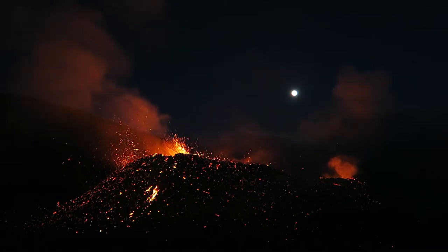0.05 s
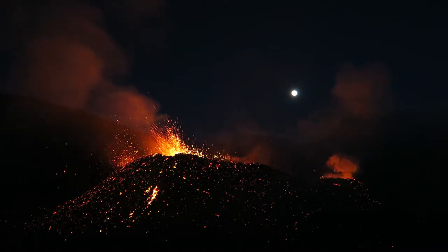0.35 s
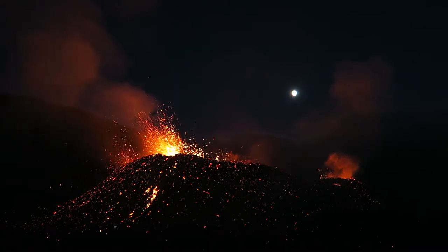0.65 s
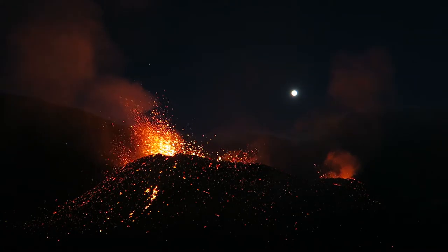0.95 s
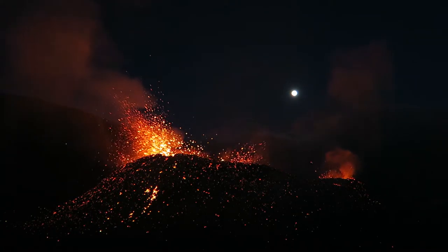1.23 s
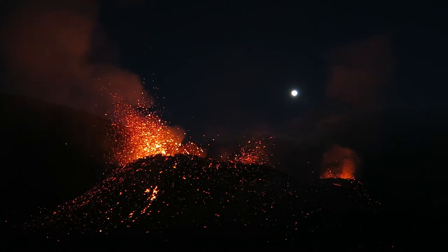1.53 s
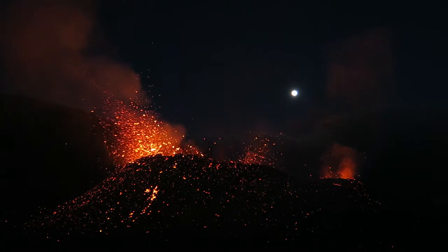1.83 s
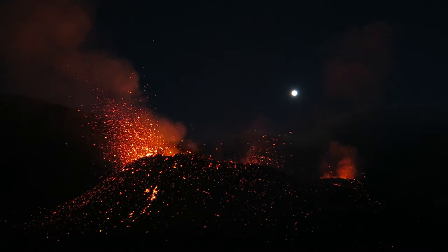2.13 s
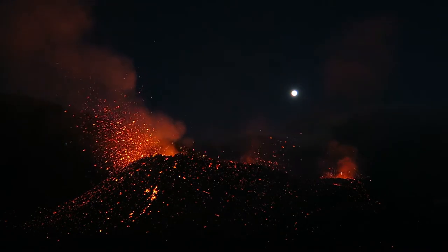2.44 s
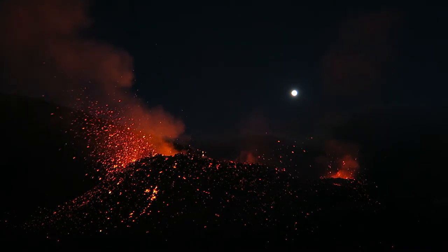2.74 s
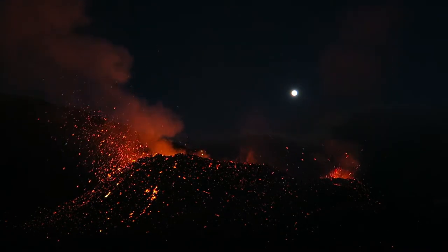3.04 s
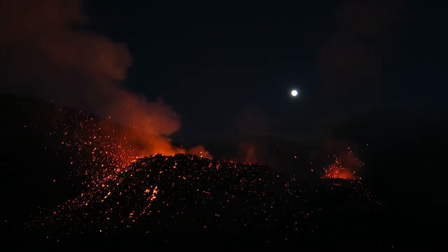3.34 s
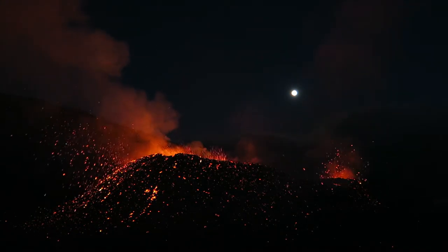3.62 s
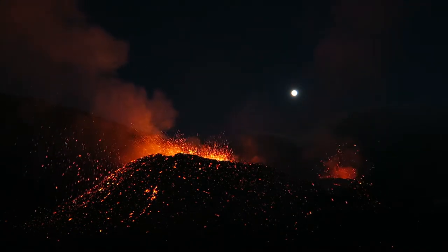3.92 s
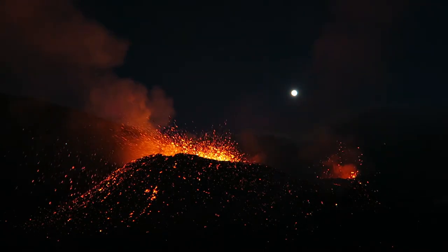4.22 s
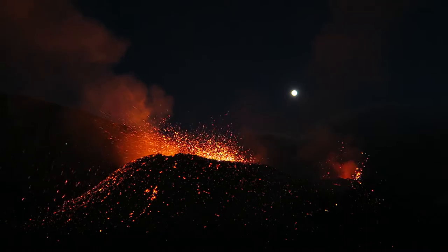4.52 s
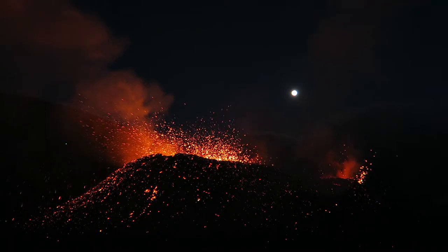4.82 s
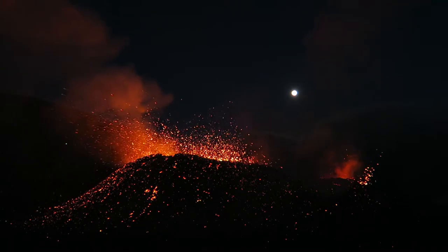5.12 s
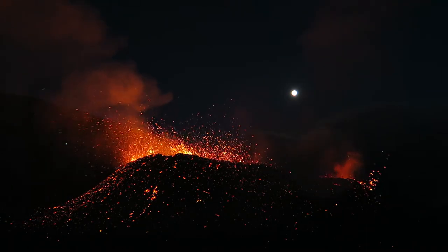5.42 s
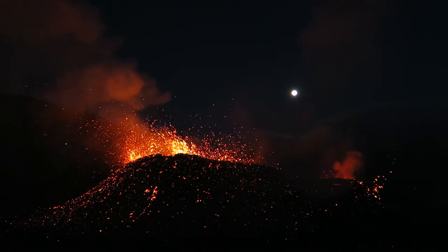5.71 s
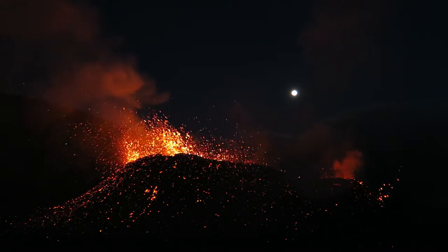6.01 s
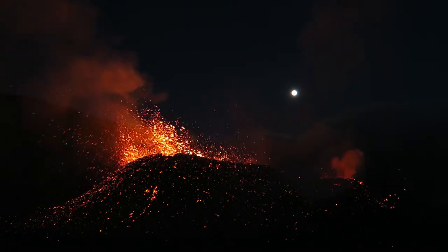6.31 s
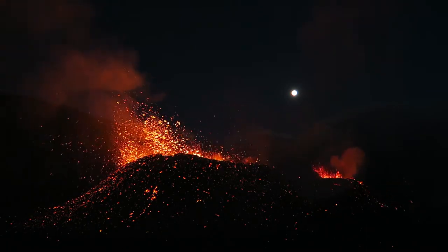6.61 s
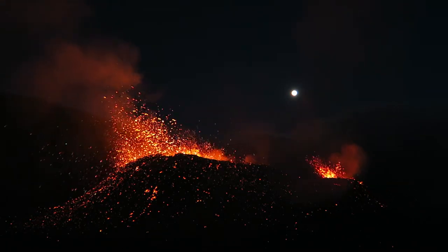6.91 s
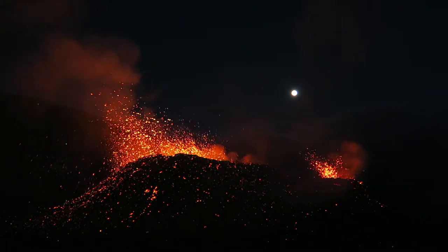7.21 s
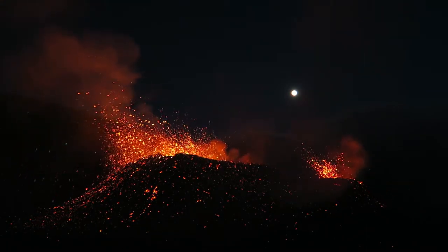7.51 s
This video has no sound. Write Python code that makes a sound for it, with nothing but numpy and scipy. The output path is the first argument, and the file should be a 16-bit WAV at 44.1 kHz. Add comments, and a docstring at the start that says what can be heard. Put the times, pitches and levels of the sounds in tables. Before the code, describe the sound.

Low wind noise on an outdoor microphone dominates, close and wide, with a volcano rumbling far ahead. In the first half second the wind is light and distant gas jets give a short roar and hiss. From about 0.6 seconds gusts hit hard, with irregular thumps, hollow pops, crackle and tiny dry ticks. The buffeting is densest from 1.2 to 2.2 seconds, turns to choppy flutter, and thumps again near 3.5. A faint jet roars around 3.7 seconds as the wind briefly drops. Strong thumps follow at about 4.3 and 4.7 seconds. From 5 to 5.8 seconds the wind eases, revealing rushing spurts from the vents that swell into a soft roar and fine hiss around 6. Gusts return at 6.1 seconds with knocks and pops, dip near 6.8, then build again until the end at about 7.7 seconds.

```python
"""Night wind at an erupting volcano

A stereo camera microphone stands in the open wind. Right at its two ports, nearly in opposite
phase, gusts flutter and eddies thump and crackle, with hollow pops and small dry ticks among them.
Far off, straight ahead, the vents rumble and let out jets of gas that swell into a roar and a hiss."""
import sys
import numpy as np
from scipy import signal
from scipy.fft import rfft, irfft
from scipy.io import wavfile
from scipy.ndimage import uniform_filter1d

SR = 44100
rng = np.random.default_rng(int(sys.argv[2]) if len(sys.argv) > 2 else 0)


def dump(signal):
    """Clip the signal to [-1, 1] and save it as 16-bit WAV at the path in sys.argv[1]."""
    limited = np.clip(np.atleast_2d(signal).T, -1, 1)
    pcm = np.round(limited * 32767).astype(np.int16)
    wavfile.write(sys.argv[1], SR, pcm)


N = 341775
TIME = np.arange(N) / SR
BINS = np.fft.rfftfreq(N, 1 / SR)


def gain_of(db):
    """Decibels to amplitude."""
    return 10 ** (np.asarray(db) / 20)


def unit_rms(x):
    """Scales to an rms of 1."""
    return x / np.sqrt(np.mean(x ** 2) + 1e-20)


def over_frequency(rows, column=1):
    """One column of a frequency table, at every bin."""
    table = np.transpose(rows)
    return np.interp(np.log(BINS + 1), np.log(table[0] + 1), table[column])


def over_time(rows, column=1):
    """One column of a time table, at every sample."""
    table = np.transpose(rows)
    return np.interp(TIME, table[0], table[column])


def coloured(x, spectrum):
    """Gives white sound a spectrum and keeps its power."""
    return irfft(rfft(x) * unit_rms(gain_of(over_frequency(spectrum))), N)


def wander(rate_hz):
    """Random drift of rms 1, mostly between 4 Hz and the rate."""
    drift = rfft(rng.standard_normal(N)) * np.exp(-(BINS / rate_hz) ** 2) * BINS / (BINS + 4)
    return unit_rms(irfft(drift, N))


def soft_wander(rate_hz, reach=1.3):
    """Random drift with its extremes rounded off."""
    return reach * np.tanh(wander(rate_hz) / reach)


def levelled(x, span_s):
    """Evens out the power over a span and leaves the faster lumps."""
    size = max(int(span_s * SR), 8)
    power = uniform_filter1d(uniform_filter1d((x ** 2).mean(0), size), size)
    return x / np.sqrt(abs(power) + 1e-9)


def stereo(mid, side):
    """Mid and side to left and right."""
    return np.array([mid + side, mid - side])


# Wind across the microphone's two ports:
# (frequency [Hz], left's phase lead [rad], likeness [0-1], left minus right [dB])
PORTS = [(25, 0.61, 0.12, 1), (56, 1.29, 0.93, -7.5), (116, 2.293, 0.94, 1), (274, 2.88, 0.92, 2.5),
         (504, 2.866, 0.92, 4), (720, 3.05, 0.81, -0.5), (1330, 4.17, 1, 0.5), (3000, 4.08, 1, 3)]

def at_ports(flows):
    """Two unrelated flows become left and right: an eddy pushes on one port as it pulls on the other."""
    left, other = rfft(flows)
    likeness = np.clip(over_frequency(PORTS, column=2), 0, .995)
    lead_rad, tilt_db = over_frequency(PORTS), over_frequency(PORTS, column=3)
    right = (likeness * left + np.sqrt(1 - likeness ** 2) * other) * np.exp(-1j * lead_rad)
    return irfft(np.array([left * gain_of(tilt_db / 2), right * gain_of(-tilt_db / 2)]), N)


def turbulence(spectrum, lumps_db):
    """Lumpy pressure noise at both ports."""
    flows = rng.standard_normal((2, N)) * gain_of(lumps_db)
    return unit_rms(at_ports(coloured(flows, spectrum)))


def narrow_bass(x, corner_hz=42):
    """The longest waves press on both ports alike, so their difference fades."""
    mid, side = (x[0] + x[1]) / 2, (x[0] - x[1]) / 2
    side = irfft(rfft(side) * BINS ** 2 / np.hypot(BINS ** 2, corner_hz ** 2), N)
    return stereo(mid, side)


# Wind pressure on the microphone: (time [s], relative level [dB])
GUSTS = [(0.0, -32), (0.3, -30.5), (0.42, -31.5), (0.56, -21), (0.71, -23.5), (0.91, -20.5), (1.16, -20.5),
         (1.36, -17), (1.62, -21), (2.0, -23.5), (2.13, -20), (2.28, -27.5), (2.38, -21.5), (2.6, -26),
         (2.68, -25), (2.76, -23), (2.92, -25), (3.14, -24), (3.32, -26), (3.42, -19), (3.52, -25),
         (3.58, -26.5), (3.74, -19.5), (3.83, -23.5), (3.9, -41.5), (4.21, -28.5), (4.26, -23),
         (4.42, -27.5), (4.6, -22.5), (4.72, -18.5), (4.87, -28.5), (5.03, -35.5), (5.56, -36), (6.11, -19),
         (6.7, -22), (6.74, -30), (6.85, -35), (6.97, -25.5), (7.15, -26.5), (7.28, -22.5), (7.58, -17.5),
         (7.74, -20.5)]
# Share of small eddies in that wind: (time [s], flutter gain [dB])
CHOPPINESS = [(0.7, -2), (1.5, 1), (2.1, 7), (2.4, 6.5), (2.9, 1.5), (4.3, 3), (4.8, -4), (6.4, -1),
              (7.6, 0.5)]
# The wind's low body and the flutter of its small eddies: (frequency [Hz], relative level [dB])
BODY_SPECTRUM = [(15, -31), (30, -19.5), (50, -11.5), (85, -2), (130, 1.5), (200, 1.5), (300, -3),
                 (470, -10.5), (520, -29.5), (800, -47), (2000, -96)]
FLUTTER_SPECTRUM = [(200, -15), (500, 5.5), (720, 1), (1000, -10), (1500, -23.5), (2500, -36), (5000, -53),
                    (12000, -69)]

def wind(flutter_db=-46.5, steepness=1.4, unrest_db=1.53, surge_db=-15):
    """Restless gusts on the microphone drive a low body and a flutter that grows faster than it."""
    pressure = gain_of(over_time(GUSTS) + wake() + unrest_db * wander(11))
    surge = gain_of(surge_db) * eddy_swells(THUMP, half_s=0.018)  # air speeds up around each eddy
    lumps = soft_wander(60)
    body = levelled(turbulence(BODY_SPECTRUM, lumps_db=4 * lumps), span_s=0.048)
    flutter = turbulence(FLUTTER_SPECTRUM, lumps_db=3.5 * lumps + 4.5 * soft_wander(110))
    flutter = levelled(flutter, span_s=0.054)
    drive_db = steepness * (20 * np.log10(pressure) + 21.5) + over_time(CHOPPINESS)
    return body * np.hypot(pressure, surge) + flutter * gain_of(drive_db + flutter_db)


def wake(depth_db=-2, lag_s=0.041, half_s=0.0031):
    """The wind sags briefly behind each strong eddy, in dB."""
    nearest = np.min([((TIME - at_s - lag_s) / half_s) ** 2 for at_s, *_ in EDDIES], axis=0)
    return depth_db * np.exp(-.5 * nearest.clip(0, 50))


def distant(spectrum, level_db, width, flicker_db):
    """Noise from straight ahead, flickering in the moving air; width is side over mid."""
    noise = rng.standard_normal((2, N)) * unit_rms(gain_of(flicker_db * wander(46)))
    mid, side = coloured(noise, spectrum)
    return stereo(mid, width * side) * gain_of(level_db)


# Low end of the far volcano and the close wind: (frequency [Hz], relative level [dB])
RUMBLE_SPECTRUM = [(12, -21.5), (25, -4), (45, 1), (70, 1.5), (120, -1.5), (250, -27), (600, -43.5),
                   (2000, -90.5)]

def rumble(volcano_db=-43, gust_db=-21, push_db=-2):
    """Deep rumble: the volcano's steady share, the weight of the gusts and the push of each eddy."""
    gusts = gain_of(gust_db + 0.7 * over_time(GUSTS))
    pushes = gain_of(push_db) * eddy_swells(PUSH, half_s=0.034)
    power = gain_of(volcano_db) ** 2 + gusts ** 2 + pushes ** 2
    return distant(RUMBLE_SPECTRUM, 10 * np.log10(power), width=0.16, flicker_db=1.5)


# Fine high fizz from the far vents: (time [s], relative level [dB])
FIZZING = [(0.55, -87.5), (0.8, -99), (1.64, -91), (2.1, -101), (2.55, -93), (2.8, -85.5), (3.1, -85),
           (3.42, -90.5), (3.55, -87), (3.72, -84), (3.9, -90.5), (4.6, -99), (5.15, -90), (5.55, -89),
           (5.7, -81), (5.92, -75.5), (6.15, -84), (6.65, -100), (7.33, -100), (7.45, -91), (7.75, -89)]
# The volcano's layers as they reach the microphone: (frequency [Hz], relative level [dB])
WASH_SPECTRUM = [(100, 1), (400, 5.5), (550, -4.5), (900, -8.5), (1400, -20.5), (2500, -37), (6000, -59)]
ROAR_SPECTRUM = [(200, -4), (450, 5.5), (750, 0), (1050, -1), (1280, -2.5), (1520, 0), (1700, -4),
                 (1900, -1.5), (2150, -6.5), (2400, -6), (3200, -15.5), (4200, -27), (6000, -43.5),
                 (10000, -56.5)]
HISS_SPECTRUM = [(1500, -20.5), (2800, 2.5), (3800, 1), (4800, -4), (5600, -8), (7000, -15), (9000, -25),
                 (13000, -42)]
FIZZ_SPECTRUM = [(4000, -3.5), (7000, 8), (9000, 6), (11500, 5), (13000, -8)]

def volcano():
    """Far ahead, a steady wash lies under the roar, hiss and fizz of escaping gas."""
    roar_db, hiss_db = gas_levels()
    wash = distant(WASH_SPECTRUM, level_db=-54.5, width=.4, flicker_db=-0.5)
    roar = distant(ROAR_SPECTRUM, roar_db + 6.5, width=.17, flicker_db=1.0)
    hiss = distant(HISS_SPECTRUM, hiss_db + 9, width=.38, flicker_db=1.5)
    fizz = distant(FIZZ_SPECTRUM, over_time(FIZZING) - 1 + 2 * wander(10), width=.6, flicker_db=0.6)
    return (wash + roar + hiss + fizz + vent_throats()) * gain_of([[.2], [-.2]])  # a touch to the left


# Steady escape of gas from the far vents: (time [s], relative roar [dB], relative hiss [dB])
VENTING = [(0.65, -66.5, -81), (1.15, -74, -88.5), (2.1, -77.5, -92.5), (3.001, -74.5, -86.5),
           (3.499, -74, -88), (3.9, -65.5, -85), (4.6, -69.5, -86), (5.2, -64, -87.5), (6.1, -61, -79.5),
           (6.4, -66, -83), (6.52, -79.5, -93), (6.651, -68.5, -89.5), (7.101, -72.5, -95), (7.7, -70, -84)]
# Jets from those vents: (start [s], end [s], relative roar [dB], relative hiss [dB],
# throat level [dB], throat resonance [Hz], resonance width [Hz])
JETS = [(-0.05, 0.6, -55.5, -71, -74.5, 3600, 2600), (0.273, 0.293, -51.5, -66.5, -63, 1500, 2000),
        (0.338, 0.357, -50.5, -67.5, -39, 487, 298), (0.352, 0.482, -62, -87, -54, 1000, 1390),
        (0.46, 0.575, -52.5, -76, -59, 1700, 1800), (0.59, 0.631, -58.5, -80, -68, 3880, 2400),
        (1.021, 1.101, -63.5, -86.5, -75.5, 3490, 2390), (3.6, 3.85, -54, -80.5, -65.5, 2900, 2390),
        (4.897, 5.096, -70, -100, -59, 750, 700), (5.125, 5.27, -62, -84.5, -53, 755, 990),
        (5.28, 5.545, -65, -88, -52, 710, 1100), (5.642, 6.07, -72, -78, -66.5, 3970, 1500),
        (6.062, 6.156, -57, -90, -55.5, 1094, 996), (6.19, 6.266, -59, -98, -48, 1130, 1450),
        (7.43, 7.675, -78, -86.5, -76.5, 4550, 950)]

def gas_levels():
    """Roar and hiss in dB: every jet adds its power to the steady venting."""
    power = gain_of([over_time(VENTING, column=1), over_time(VENTING, column=2)]) ** 2
    for start, end, roar_db, hiss_db, *_ in JETS:
        power += (gain_of([[roar_db], [hiss_db]]) * jet_flow(start, end)) ** 2
    return 10 * np.log10(power)


def jet_flow(start, end, rise_s=0.078, fall_s=0.12):
    """Gas flow of one jet: it opens, holds and shuts, faster if the jet is short."""
    half_s = (end - start) / 2
    opening = np.clip((TIME - start) / min(rise_s, half_s) + .5, 0, 1)
    shutting = np.clip((end - TIME) / min(fall_s, half_s) + .5, 0, 1)
    return opening * shutting


def vent_throats(flicker_db=-1.5, width=.2):
    """Each jet excites one broad resonance of its vent, swelling and fading."""
    out = np.zeros((2, N))
    flicker = gain_of(flicker_db * wander(40))
    for start, end, _, _, db, centre_hz, width_hz in JETS:
        resonance = (1 + ((BINS - centre_hz) / width_hz) ** 2) ** -3
        mid, side = unit_rms(irfft(rfft(rng.standard_normal((2, N))) * resonance, N))
        out += gain_of(db) * jet_flow(start, end) * stereo(mid, width * side)
    return out * flicker


# The strongest eddies to hit the microphone, in relative levels:
# (time [s], thump [dB], knock [dB], deep push [dB])
EDDIES = [(0.112, -23, -61, -38), (0.209, -17.5, -63, -33), (0.299, -15.5, -45, -22),
          (0.581, -16.5, -42, -14), (0.633, -7.5, -30, -28), (0.777, -19.5, -46.5, -20),
          (0.836, -6.5, -36, -39), (0.989, -14.5, -47.5, -32), (1.095, -7.5, -54.5, -22),
          (1.178, -23, -42.5, -44.5), (1.252, -8, -29, -25.5), (1.344, -10, -37.5, -30),
          (1.41, -12.5, -39, -29), (1.472, -22, -36, -45), (1.518, -19.5, -38, -39),
          (1.575, -15.5, -41, -46), (1.651, -12, -25, -30), (1.686, -14, -39, -41), (1.736, -9.5, -28, -22),
          (1.849, -8.5, -27, -38), (1.942, -14.5, -37, -48), (2.053, -15, -36, -40.5),
          (2.095, -13.5, -34, -30.5), (2.142, -12.5, -40.5, -30.5), (2.182, -15.5, -41, -43),
          (2.236, -18, -46, -52.5), (2.33, -24, -42, -47), (2.384, -13, -48, -43),
          (2.476, -16.5, -36.5, -58), (2.521, -18, -50, -43), (2.601, -13.5, -39.5, -50),
          (2.735, -16.5, -43, -44), (2.84, -21, -50, -49.5), (2.998, -15, -47, -55), (3.065, -21, -60, -47),
          (3.427, -11, -39, -42), (3.476, -8.5, -43, -29.5), (3.532, -20, -32, -53), (3.995, -23, -60, -57),
          (4.113, -24, -50, -29.5), (4.239, -11, -65, -40), (4.275, -7.5, -33, -24),
          (4.348, -21.5, -40, -39.5), (4.509, -16, -43, -43.5), (4.715, -7, -36, -26.5),
          (4.8, -20, -48, -43), (4.871, -19, -58.5, -36), (4.943, -17, -64, -43), (5.365, -22, -61.5, -33),
          (6.087, -11.5, -36, -29.5), (6.207, -10.5, -32.5, -26.5), (6.259, -13, -41, -26),
          (6.333, -17.5, -42.5, -29.5), (6.386, -25, -41.5, -32.5), (6.419, -14, -40, -32),
          (6.463, -11, -39, -37), (6.478, -9, -38, -29.5), (6.519, -15, -46, -48), (6.65, -9, -38, -41.5),
          (6.665, -14, -50, -45), (6.698, -13.5, -41, -49), (6.912, -21, -57, -40),
          (7.222, -13.5, -37.5, -55), (7.317, -16, -37, -52), (7.445, -28, -41, -33),
          (7.462, -10.5, -45, -29), (7.566, -13, -56, -33), (7.655, -13, -54, -41)]
THUMP, KNOCK, PUSH = 1, 2, 3  # its columns
# The hard knock on top of an eddy: (frequency [Hz], relative level [dB])
KNOCK_SPECTRUM = [(250, -16.5), (500, 11), (720, 0.5), (950, -5), (1200, -14.5), (1700, -25.5),
                  (2500, -49.5), (5000, -54), (12000, -70.5)]

def buffets(thump_db=-1, shared=0.26):
    """Each strong eddy is a low thump with a knock on top; both ports feel part of the knock alike."""
    thump = levelled(turbulence(BODY_SPECTRUM, lumps_db=0), span_s=0.027) * gain_of(thump_db)
    knock = turbulence(KNOCK_SPECTRUM, lumps_db=0)
    knock += shared * coloured(rng.standard_normal(N), KNOCK_SPECTRUM)
    knock = levelled(knock, span_s=0.0033)
    return thump * eddy_swells(THUMP, half_s=0.008) + knock * eddy_swells(KNOCK, half_s=0.0093)


def eddy_swells(column, half_s):
    """A bell-shaped swell at each strong eddy, as high as one column of its row."""
    out = np.zeros(N)
    for eddy in EDDIES:
        at_s = eddy[0]
        near = slice(*np.searchsorted(TIME, [at_s - .2, at_s + .2]))
        out[near] += gain_of(eddy[column]) * np.exp(-.5 * ((TIME[near] - at_s) / half_s) ** 2)
    return out


# Snaps right at the ports: (frequency [Hz], relative level [dB])
CRACKLE_SPECTRUM = [(700, -3), (1600, 5.5), (2300, -3), (3200, -17.5), (6000, -38.5), (10000, -58.5)]

def crackle(snaps_per_s=220, uneven_db=5, level_db=-25):
    """Tiny uneven snaps at each port follow the knock of the eddy that they ride on."""
    snaps = (rng.random((2, N)) < snaps_per_s / SR) * rng.choice([-1, 1], (2, N))
    snaps = snaps * gain_of(uneven_db * rng.uniform(-1, 1, (2, N)))
    crackling = unit_rms(at_ports(coloured(snaps, CRACKLE_SPECTRUM)))
    return crackling * gain_of(level_db) * eddy_swells(KNOCK, half_s=0.01)


# Hollow pops and dull thuds on the microphone: (time [s], envelope peak [dB], pitch [Hz])
POPS = [(.297, -15, 91), (.636, -15.5, 220), (.639, -27.5, 726), (.837, -19, 704), (1.242, -42, 950),
        (1.473, -33.5, 980), (1.661, -30.5, 845), (1.738, -14, 280), (1.854, -35, 900), (2.095, -39.5, 785),
        (2.183, -18, 300), (2.571, -38, 720), (2.972, -34, 625), (3.533, -33, 815), (4.234, -15.5, 109),
        (4.273, -15, 189), (4.716, -34.5, 840), (6.085, -14.5, 354), (6.477, -11.5, 240)]

def pops(half_cycles=0.6):
    """Pressure pulses of about two cycles that reach both ports together."""
    out = np.zeros(N)
    for at_s, db, hz in POPS:
        near = abs(TIME - at_s) < .02
        cycles = (TIME[near] - at_s) * hz
        envelope = gain_of(db) * np.exp(-.5 * (cycles / half_cycles) ** 2)
        out[near] += envelope * np.sin(2 * np.pi * cycles)
    return out


# Small crisp ticks, close up: (time [s], relative level [dB], resonance [Hz])
TICKS = [(0.595, -44, 3620), (0.836, -48, 1910), (1.642, -53.5, 2610), (1.727, -54.5, 2810),
         (1.737, -44.5, 1620), (1.75, -59, 3000), (2.027, -57, 2600), (2.047, -56, 2820),
         (2.091, -57, 2600), (2.101, -55, 2700), (2.121, -53.5, 2600), (2.184, -56, 1900),
         (4.037, -52.5, 3200), (4.271, -53, 2800), (4.281, -51.5, 3200), (4.473, -50, 3500),
         (4.826, -55, 3010), (5.092, -54, 3300), (7.402, -53, 1890), (7.453, -49, 2100)]

def ticks(decay_s=0.0011, relative_width=.75, length_s=.02):
    """Tiny dry clicks at the microphone, each with one broad resonance."""
    out = np.zeros((2, N))
    t = np.arange(0, length_s, 1 / SR)
    hz = np.fft.rfftfreq(len(t), 1 / SR)
    fade = np.exp(-t / decay_s)
    for at_s, db, centre_hz in TICKS:
        resonance = (1 + ((hz / centre_hz - 1) / relative_width) ** 2) ** -3
        click = irfft(rfft(rng.standard_normal((2, len(t)))) * resonance, len(t)) * fade
        click *= np.linalg.norm(fade) / np.linalg.norm(click, axis=1, keepdims=True)
        start = round(at_s * SR)
        out[:, start:start + len(t)] += gain_of(db) * click
    return at_ports(out)


def scene():
    """Wind right on the microphone, the volcano far off."""
    return narrow_bass(wind() + buffets()) + crackle() + pops() + rumble() + volcano() + ticks()


def record(dry):
    """The camera rounds off the strongest thumps at full scale and cuts the top treble; soft ends."""
    rounded = dry / (1 + dry ** 8) ** (1 / 8)
    faded = rounded * signal.windows.tukey(N, .001)
    lowpass = signal.firwin(511, cutoff=12800, window=("kaiser", 9), fs=SR)
    return signal.oaconvolve(faded, lowpass[None], "same")


dry = scene()
out = record(dry)
dump(out)
```